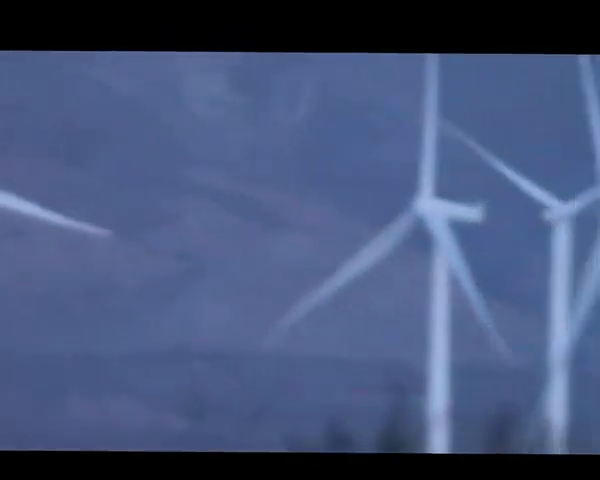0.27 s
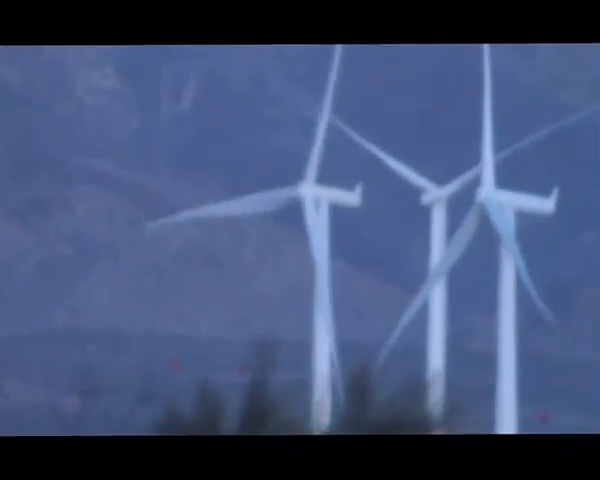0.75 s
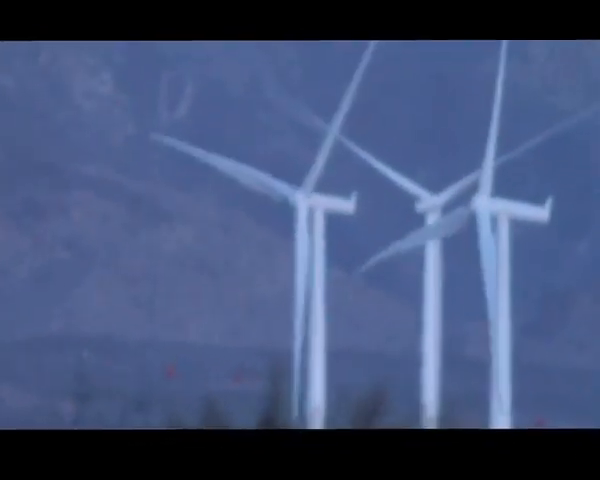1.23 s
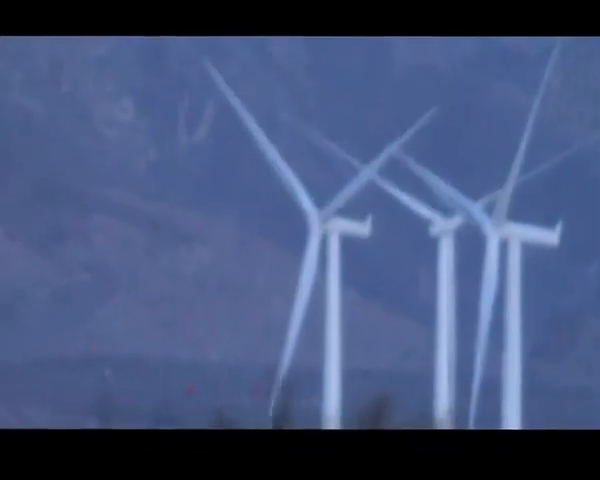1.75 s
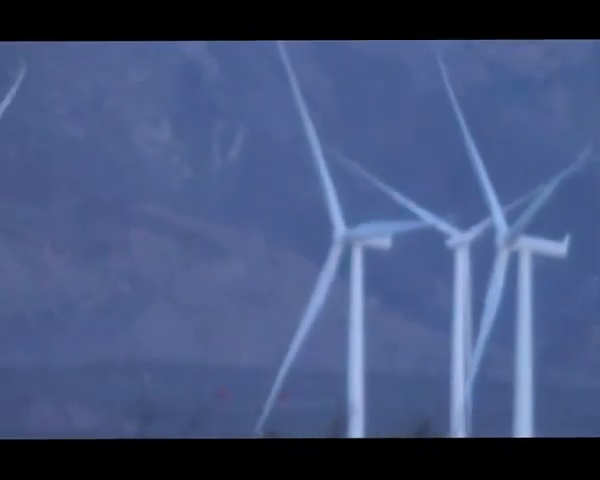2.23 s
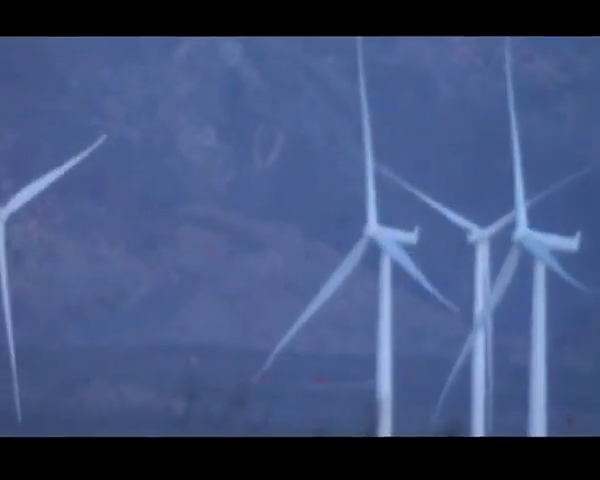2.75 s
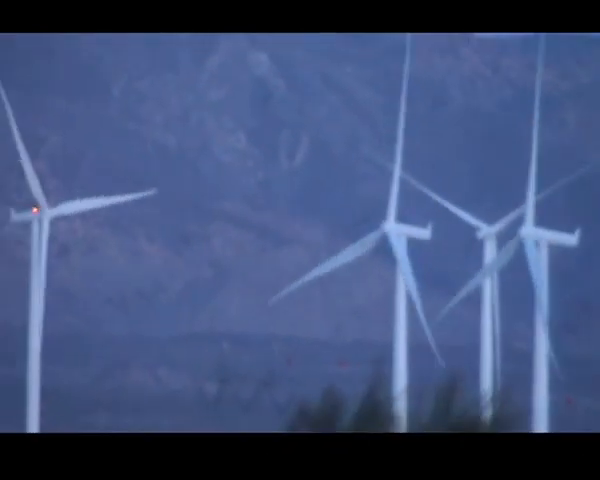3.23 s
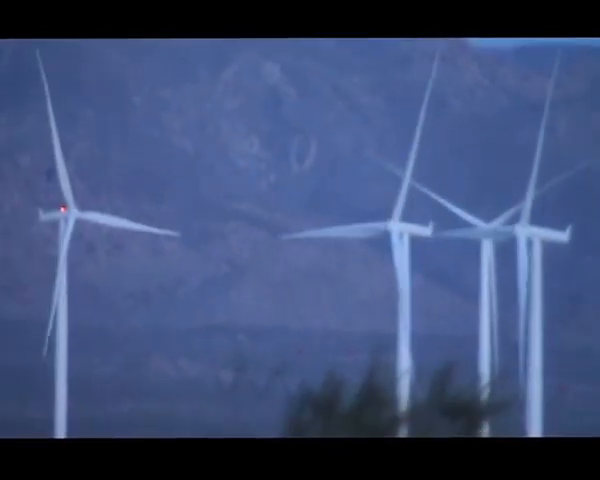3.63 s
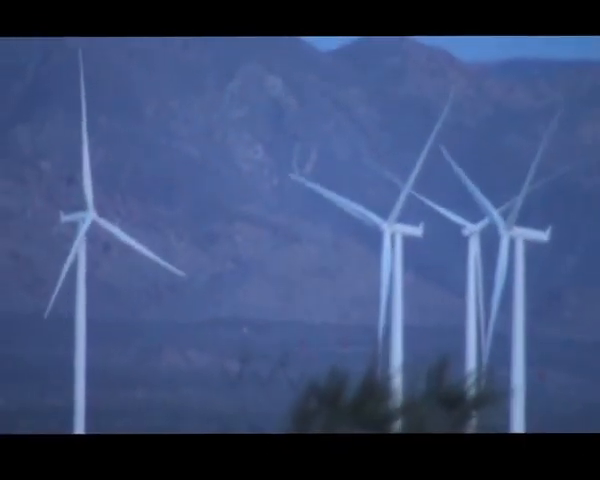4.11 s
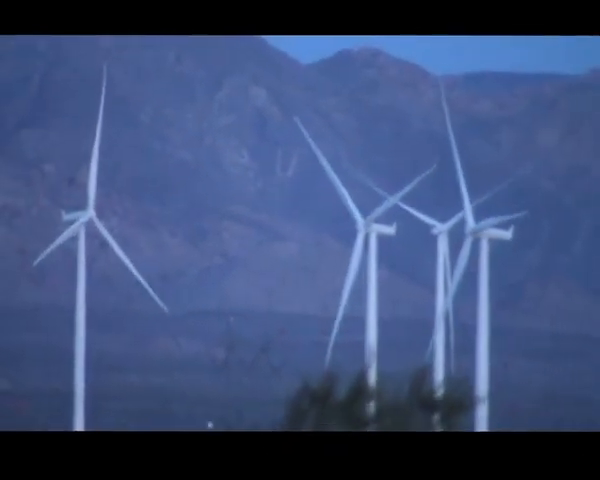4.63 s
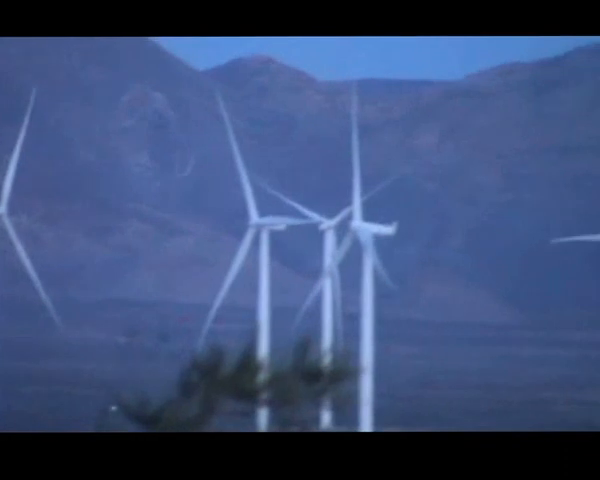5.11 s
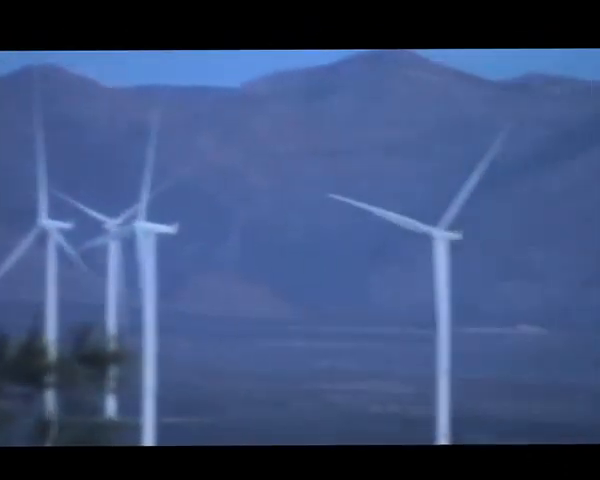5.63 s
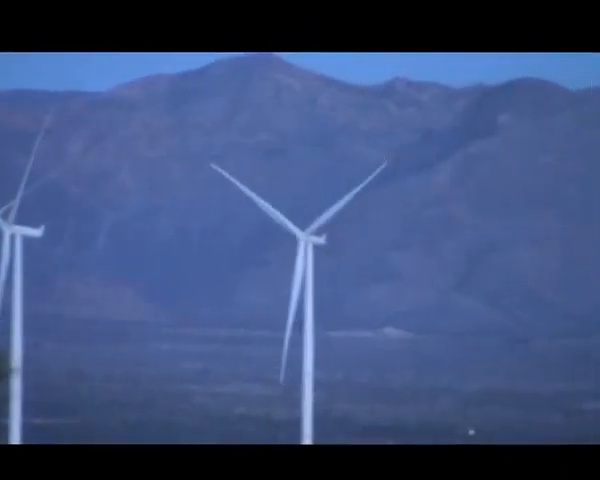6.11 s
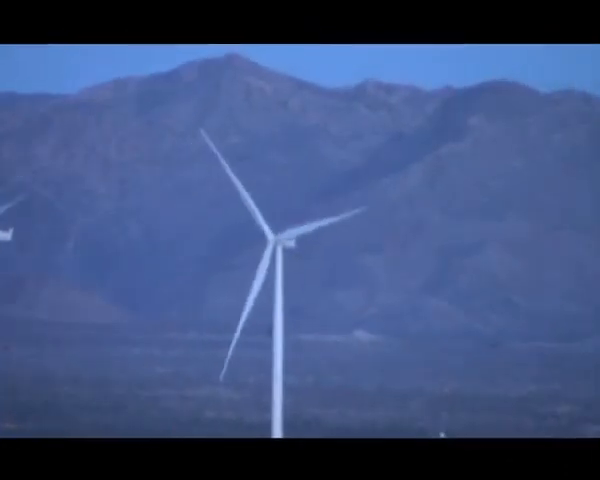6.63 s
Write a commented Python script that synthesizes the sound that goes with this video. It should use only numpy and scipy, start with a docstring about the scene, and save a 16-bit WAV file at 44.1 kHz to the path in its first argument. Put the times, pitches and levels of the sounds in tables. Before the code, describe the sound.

Outdoors in open country, gusts of wind hit the microphone directly, making a deep, ragged rumble with flapping and dull pops. The wind eases briefly, surges hardest through the first half, then dips and rises again. A very faint zoom motor whines twice beneath it over a light hiss, and fingers click on the camera's plastic body, most clearly late on.

```python
"""Desert wind on a camera microphone.

Gusty flow past the two ports of a hand-held camera is heard as turbulent pressure: large eddies
rumble, smaller ones ride on them and tear, and single vortices thump one port. Far underneath,
over a steady hiss, the zoom motor whines twice and fingers click on the resonant camera body."""
import sys
import numpy as np
from scipy import signal
from scipy.fft import rfft, irfft
from scipy.io import wavfile
from scipy.ndimage import uniform_filter1d

SR = 44100
rng = np.random.default_rng(int(sys.argv[2]) if len(sys.argv) > 2 else 0)


def materialize(psi):
    """Save the field psi as 16-bit PCM at rate SR to the path in sys.argv[1].

    A 1-D psi becomes a single channel; in a 2-D psi each row is a channel.
    """
    bounded = np.clip(np.atleast_2d(psi).T, -1, 1)
    quanta = np.round(bounded * 32767).astype(np.int16)
    wavfile.write(sys.argv[1], SR, quanta)


N = 302526
TIME = np.arange(N) / SR
FREQ = np.fft.rfftfreq(N, 1 / SR)


def gain_of(db):
    """Amplitude ratio of a level: a factor of ten per 20 dB."""
    return 10 ** (np.asarray(db) / 20)


def unit_rms(x):
    """Normalisation to unit mean power."""
    return x / np.sqrt(np.mean(x ** 2) + 1e-20)


def curve(points):
    """Interpolation of (f/Hz, value) points over logarithmic frequency."""
    hz, value = np.transpose(points)
    return np.interp(np.log(FREQ + 1), np.log(hz + 1), value)


def white():
    """White noise spectrum: equal mean power at all frequencies, random phase."""
    return rng.standard_normal(len(FREQ)) + 1j * rng.standard_normal(len(FREQ))


def noise_pair(coherence):
    """Partial coherence: the right noise spectrum shares a part of the left."""
    shared, left = np.clip(coherence, 0, 1), white()
    return np.array([left, shared * left + np.sqrt(1 - shared ** 2) * white()])


def below(hz, order=4):
    """Butterworth low-pass magnitude."""
    return 1 / np.sqrt(1 + (FREQ / hz) ** (2 * order))


def above(hz, order=4):
    """The power-complementary high-pass magnitude."""
    return np.sqrt(1 - below(hz, order) ** 2)


def resonance(hz, centre_hz, width_hz):
    """Lorentzian peak of a damped mode."""
    return 1 / (1 + (2 * (hz - centre_hz) / width_hz) ** 2)


def flutter(slow_hz, fast_hz):
    """Random modulation: band-limited, roughly pink noise of rms 1."""
    return unit_rms(irfft(white() * above(slow_hz) * below(fast_hz) / np.sqrt(FREQ + slow_hz), N))


def bump(at, half_s):
    """Gaussian pulse of height 1."""
    return np.exp(-np.minimum(((TIME - at) / half_s) ** 2, 50))


def envelope(x, seconds):
    """Running rms: power averaged over the ports and a sliding window."""
    size = max(int(seconds * SR), 2)
    power = uniform_filter1d(uniform_filter1d((x ** 2).mean(0), size), size)
    return np.sqrt(abs(power) + 1e-12)


def hiss():
    """Noise floor: stationary broadband noise and faint wavering tones of the electronics."""
    # noise spectrum: f/Hz, relative density/dB
    density = [(300, 0.4), (1500, -3), (2800, -5), (3500, -5), (4300, -8), (5100, -9), (7000, -13.5),
               (10000, -15), (15500, -17)]
    # likeness of the channels: f/Hz, coherence
    coherence = [(1000, 0.26), (5000, 0.13), (15000, 0.6)]
    # electronic tones: f/Hz, level/dB
    lines = [(3375, -76), (4890, -79), (5238, -81)]
    spectrum = noise_pair(curve(coherence)) * gain_of(curve(density))
    treble = irfft(spectrum * above(4320) * below(17600), N)
    out = irfft(spectrum, N) * gain_of(-62.5) / np.std(treble)
    for hz, db in lines:
        amplitude = gain_of(db + 3.2 * flutter(2, 13))
        out += amplitude * np.sin(2 * np.pi * np.cumsum(hz + 4 * flutter(5.5, 30)) / SR)
    return out


def squeaks(pitch_hz, steps_per_s=15, half_s=.016):
    """Gear squeaks: one Gaussian tone burst per zoom step, of random strength and pitch."""
    step, part = np.divmod(TIME * steps_per_s, 1)
    strength, detune = rng.standard_normal((int(step[-1]) + 1, 2))[step.astype(int)].T
    hz = pitch_hz + 130 * detune + 60 * flutter(30, 300)
    burst = np.exp(-((part - .5) / steps_per_s / half_s) ** 2)
    return gain_of(4 * np.minimum(strength, 1.5)) * burst * np.sin(2 * np.pi * np.cumsum(hz) / SR)


def zoom_motor(whine_hz=6638):
    """Forced vibration: the motor whines, and its gears squeak and excite the lens barrel's modes."""
    # motor runs: start t/s, end t/s, whine level/dB, squeak f/Hz, squeak re rasp/dB, squeaks end t/s
    runs = [(0, 0.51, -67.5, 7660, -1, .33), (1.683, 5.612, -66, 7900, 2, 4.15)]
    # rasp of the gears: t/s, level/dB
    gear_levels = [(0, -62.5), (.25, -61.5), (.42, -60.5), (.52, -75), (1.68, -68), (2.6, -66.5),
                   (3.2, -70.5), (4, -71), (5.6, -74)]
    # barrel resonances: f/Hz, bandwidth/Hz, relative level/dB
    modes = [(3800, 710, -5), (4820, 940, 0), (7720, 680, 1), (9900, 970, -1.5), (11550, 590, -2.5)]
    start, end, whine_db, squeak_hz, squeak_db, squeaks_end = np.transpose(runs)[:, :, None]
    running = np.clip((TIME - start) / .0068, 0, 1) * np.clip((end - TIME) / .003, 0, 1)
    cycles = np.cumsum(whine_hz + 16 * flutter(3.2, 63)) / SR
    whine_rms = gain_of(3.15 * flutter(6.1, 140)) * (running * gain_of(whine_db)).sum(0)
    whine = whine_rms * np.sqrt(2) * np.sin(2 * np.pi * cycles)
    barrel = sum(gain_of(db) * resonance(FREQ, hz, width) for hz, width, db in modes)
    rasp = unit_rms(irfft(noise_pair(.77) * barrel, N) * gain_of(2 * flutter(7.4, 40)))
    squeak_gain = (running * (TIME < squeaks_end) * gain_of(squeak_db)).sum(0)
    gears = rasp * running.sum(0) + squeak_gain * squeaks((running * squeak_hz).sum(0))
    gears *= gain_of(np.interp(TIME, *np.transpose(gear_levels)))
    return whine * gain_of([[2.2], [-2.5]]) + gears * gain_of([[-2.4], [1.8]])  # whine left, gears right


def finger_clicks(ping_hz=9440, slide_s=.02):
    """Friction and impact excite the damped plastic shell: a swelling scrape, a snap, a duller rub."""
    # response of the shell: f/Hz, relative density/dB
    shell = [(400, -26), (700, -1), (950, 4.5), (1400, 4), (1900, 3), (2650, -7), (3450, -2.5), (4300, 1),
             (5300, -12), (6500, -5.5), (7600, -16), (9600, -16), (11500, -22), (15000, -36)]
    # clicks: t/s, relative level/dB, tilt/(dB/octave), decay/ms, gains/dB of scrape, rub and ping
    touches = [(.4072, -30.5, 6, 3.1, -10, -2.5, -30), (.5024, -38.5, 5, 3.2, -30, -30, -12),
               (1.1529, -42, 7, 2.4, -30, -30, -20), (1.6872, -39, 3, 2, -30, -30, -14),
               (5.5618, -15.5, -3.5, 2.5, -17.5, -27, -19), (5.6085, -37, 0, 2, -30, -30, -20),
               (6.8065, -32, 11, 1.7, -22, -22, -20), (6.8275, -20.5, 6, 2.1, -17, -22, 6),
               (6.8458, -17, 0, 2.4, -20, -19, -12)]
    out = np.zeros((2, N))
    t = np.arange(-2048, 4096) / SR  # impact at t = 0
    hz = np.fft.rfftfreq(len(t), 1 / SR)
    shell_db = np.interp(hz, FREQ, curve(shell))
    octaves = np.log2(np.maximum(hz, 900) / 3000)
    ping = resonance(hz, ping_hz, width_hz=1100)  # a small part in the shell
    for at, db, tilt_db, decay_ms, scrape_db, rub_db, ping_db in touches:
        noise = rng.standard_normal((2, 2, len(t))) + .6 * rng.standard_normal((2, 1, len(t)))
        blow, friction = rfft(noise)
        snap = unit_rms(irfft(blow * (gain_of(shell_db + tilt_db * octaves) + gain_of(ping_db) * ping)))
        snap *= np.exp(-abs(t) * 1000 / decay_ms)
        grain_db = 4.5 * unit_rms(uniform_filter1d(rng.standard_normal(len(t)), size=50))
        slide = np.exp(-abs(t) / slide_s) * unit_rms(gain_of(grain_db))
        scrape = gain_of(scrape_db) * slide * unit_rms(irfft(friction * gain_of(shell_db - octaves)))
        rub = gain_of(rub_db) * slide * unit_rms(irfft(friction * gain_of(shell_db - 2 * octaves)))
        span = out[:, max(round((at + t[0]) * SR), 0):][:, :len(t)]
        span += gain_of(db - 6) * np.where(t < 0, scrape, snap + rub)[:, :span.shape[1]]
    return out


def vortices():
    """A vortex is a pressure pulse at one port; the far channel has its bass in phase, the rest inverted."""
    # strongest vortices: t/s, relative pressure, half-width/ms, port (0 left, 1 right)
    pulses = [(0.9183, 0.56, 0.48, 0), (0.9792, 0.29, 0.43, 0), (2.01, 1.04, 1, 0), (2.528, 0.69, 0.43, 0),
              (3.179, 0.36, 0.72, 0), (3.37, 0.74, 0.58, 1), (4.021, 0.97, 0.43, 0), (4.059, 1.18, 0.82, 0),
              (4.334, 0.74, 0.55, 0), (4.565, 0.82, 0.32, 0), (5.024, 0.66, 0.38, 1), (5.257, 0.54, 0.5, 1),
              (6.303, 1.1, 0.38, 0), (6.349, 1.4, 1, 0)]
    ports = np.zeros((2, N))
    for (at, pressure, half_ms, port), sign in zip(pulses, rng.choice([-1, 1], len(pulses))):
        offset = (TIME - at) * 1000 / half_ms
        ports[int(port)] += sign * pressure / (1 + offset ** 2 / 2) ** 2
    near = rfft(ports) * above(37, order=2)
    crossfeed = .56 * below(126) - .68 * above(174, order=2)
    return irfft(near + crossfeed * near[::-1], N)


def flaps(weak_per_s=4, weak_db=5, weak_half_ms=2.5):
    """Flow separation at a port's edge briefly lifts the fine eddies; returns the lift in dB."""
    # hard flaps: t/s, lift/dB, half-width/ms
    hard = [(.753, 9, 6.6), (.921, 7, 4.6), (.974, 8.5, 2.4), (1.304, 8, 8), (1.625, 8, 5.4),
            (1.830, 9.5, 5.1), (2.027, 10.5, 4.9), (2.282, 7.5, 3.5), (2.346, 7.5, 5.9), (2.382, 5, 2),
            (2.411, 11.5, 1.9), (2.685, 10, 4.6), (3.092, 9.5, 4.8), (3.181, 13.5, 2.6), (3.286, 4, 3.8),
            (3.360, 7, 4), (3.392, 8.5, 16), (4.490, 8, 23), (4.564, 2, 3), (5.259, 11, 2),
            (5.939, 12, 6.6), (6.115, 6, 2.6), (6.207, 11, 2.4), (6.345, 8.5, 3.7), (6.450, 8, 12)]
    draws = rng.random((80, 3))
    chance = weak_per_s * N / SR / len(draws)
    weak = [(when * N / SR, weak_db * size, weak_half_ms) for when, size, draw in draws if draw < chance]
    lift_db = np.zeros(N)
    for at, db, half_ms in list(hard) + weak:
        lift_db = np.maximum(lift_db, db * bump(at, half_ms / 1000))
    return lift_db


def eddies(band):
    """Turbulent pressure of one range of eddy sizes, partly coherent at the ports, at steady strength."""
    # pressure spectrum: f/Hz, relative density/dB
    turbulence = [(10, -44), (25, -7.5), (48, 1.5), (75, 3.5), (125, -3.5), (200, -6.5), (310, -11.5),
                  (500, -19), (1000, -30.5), (2000, -45), (3400, -60.5), (4600, -69), (16000, -100)]
    # likeness of the ports: f/Hz, coherence
    coherence = [(12, .4), (25, .72), (42, .9), (65, .89), (90, .72), (150, .28), (230, .47), (430, .68),
                 (1000, .66), (2200, .7), (3200, .55), (6000, .3)]
    # phase between the ports, negative where the right leads: f/Hz, phase/rad
    phase = [(25, 0), (70, .15), (95, -.05), (130, -.5), (200, -1.65), (300, -2.3), (480, -2.7),
             (700, -2.7), (1500, -2.35), (2300, -2.05), (3400, -1.2)]
    # left port relative to right: f/Hz, level/dB
    balance = [(25, .7), (50, 1.3), (80, 3.4), (160, 2.5), (320, .4), (1000, -.4), (2500, -.8)]
    lean = gain_of(curve(balance) / 2)
    ports = np.array([lean, np.exp(-1j * curve(phase)) / lean])
    pressure = irfft(noise_pair(curve(coherence)) * ports * gain_of(curve(turbulence)) * band, N)
    return pressure / envelope(pressure, .044)


def ride(small, large, coupling, burst_db):
    """Intermittency: small eddies come in bursts, strongest on the crests of the large ones."""
    crest = envelope(large, .0036) / envelope(large, .046)
    bursts = crest ** coupling * gain_of(burst_db)
    return small * bursts / envelope(bursts[None], .3)


def wind():
    """Turbulent cascade from rumble to fizz: the faster the flow, the greater the share of fine eddies."""
    # strength of the flow: t/s, level re an average gust/dB
    gusts = [(0.0, -2.5), (0.18, -6), (0.56, -8.5), (0.72, 0.5), (0.83, -7.0), (0.92, 0), (1.23, -3),
             (1.48, -6), (1.56, 3.5), (1.96, 5.5), (2.08, 1.5), (2.36, 6), (2.71, -5), (2.81, -8.5),
             (3.09, 1.5), (3.43, 7), (3.66, -0.5), (3.99, -1.5), (4.11, 3), (4.29, -6), (4.39, 0),
             (4.66, -3), (5.34, -9), (5.96, -0.5), (6.07, -3.5), (6.32, 3), (6.68, -2), (6.86, 0.5)]
    # puffs that hit the camera: t/s, half-width/s, large-eddy lift/dB, small-eddy lift/dB
    puffs = [(0.066, 0.0085, 9, 2), (0.923, 0.027, 10.5, 7), (0.982, 0.013, 15, 6), (1.086, 0.029, 6, 9),
             (1.317, 0.026, 6.5, 7.5), (1.83, 0.013, -2, 0.5), (2.004, 0.037, 6.5, 1),
             (2.359, 0.012, -6, 3.5), (2.449, 0.04, 1, 5), (2.529, 0.0086, 8, 8.5),
             (2.646, 0.059, 7.5, 7.5), (2.937, 0.0087, 13, 5.5), (3.151, 0.01, -2, 8),
             (3.367, 0.03, 3, 0.5), (3.563, 0.071, 4, 4), (3.768, 0.044, 9, 4), (4.025, 0.01, 12.5, -3),
             (4.327, 0.021, 12.5, 8.5), (4.407, 0.016, 5.5, 12), (4.553, 0.024, 2, 9.5),
             (5.039, 0.018, 8, 7), (5.242, 0.027, 6.5, 9), (6.114, 0.008, 9.5, 7.0), (6.352, 0.015, 9, 6.5),
             (6.816, 0.039, 10, 6)]
    flow_db = np.interp(TIME, *np.transpose(gusts))
    large_db, small_db = 2.7 * flutter(2.96, 10.8), 1.5 * flutter(3.8, 29)
    for at, half_s, large_lift, small_lift in puffs:
        puff = bump(at, half_s)
        large_db += large_lift * puff
        small_db += small_lift * puff
    flap_db = flaps()
    surge, crackle = flutter(10.2, 81), flutter(79, 390)
    deep, rumble = eddies(below(42.4)), eddies(above(46.7) * below(92.7))
    buffet = ride(eddies(above(108.6) * below(462)), rumble, coupling=.18, burst_db=1.16 * surge)
    tear = ride(eddies(above(442) * below(1250)), buffet, .059, burst_db=.92 * surge + 2 * crackle)
    rasp = ride(eddies(above(1270) * below(2060)), tear, .2, burst_db=surge + 1.6 * crackle)
    fizz = ride(eddies(above(2240) * below(3500)), rasp, .3, burst_db=2.6 * surge + 2.8 * crackle)
    # each band: its level in an average gust, its growth with the flow, its share of the lifts
    return (deep * gain_of(-32.5 + .23 * flow_db + .5 * large_db + .66 * flutter(1.6, 9))
            + rumble * gain_of(-27 + .56 * flow_db + .78 * large_db)
            + buffet * gain_of(-23 + .9 * flow_db + .45 * large_db + .5 * small_db)
            + tear * gain_of(-35 + .93 * flow_db + .76 * small_db + .7 * flap_db)
            + rasp * gain_of(-50 + 1.35 * flow_db + small_db + 1.05 * flap_db)
            + fizz * gain_of(-62.8 + 1.7 * flow_db + 1.13 * small_db + 1.35 * flap_db))


def scene():
    """Superposition of the wind at the ports and the camera's own small noises."""
    return wind() + vortices() + hiss() + zoom_motor() + finger_clicks()


def record(dry):
    """Soft saturation rounds the loudest peaks; a brief fade-in and a low-pass band limit follow."""
    saturated = dry / (1 + dry ** 8) ** (1 / 8)
    fade_in = np.minimum(TIME / .003, 1)
    low_pass = signal.firwin(611, cutoff=15850, window=("kaiser", 9), fs=SR)
    return signal.oaconvolve(fade_in * saturated, low_pass[None], "same")


dry = scene()
out = record(dry)
materialize(out)
```